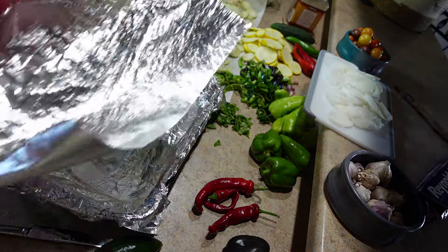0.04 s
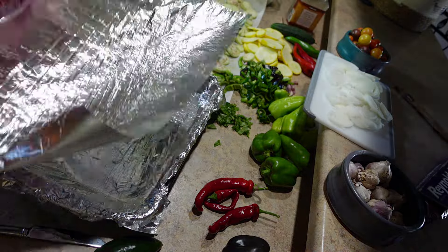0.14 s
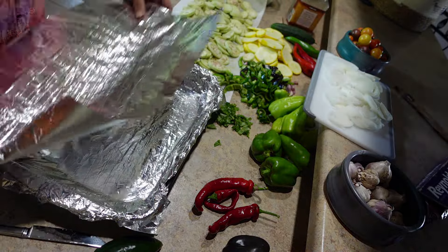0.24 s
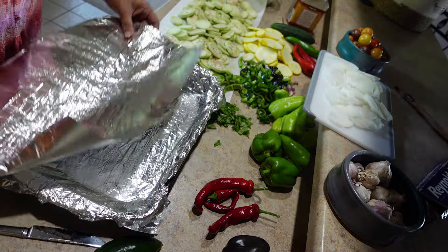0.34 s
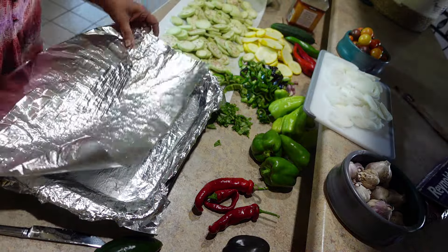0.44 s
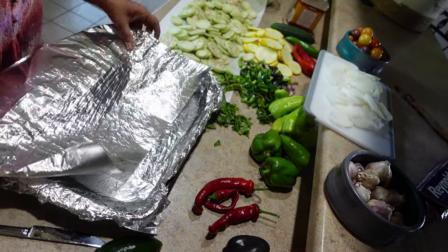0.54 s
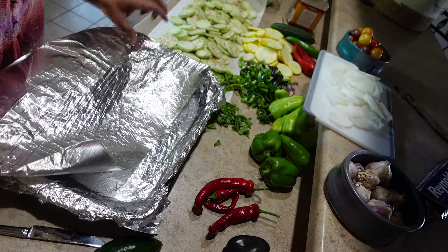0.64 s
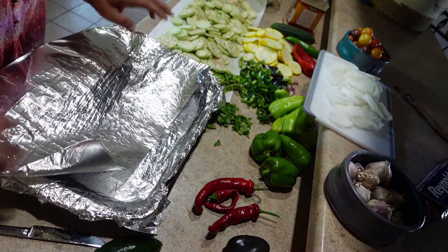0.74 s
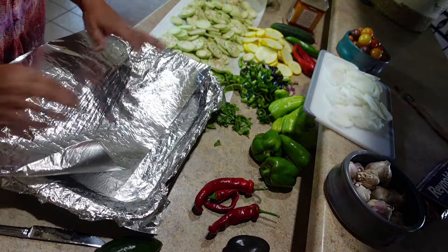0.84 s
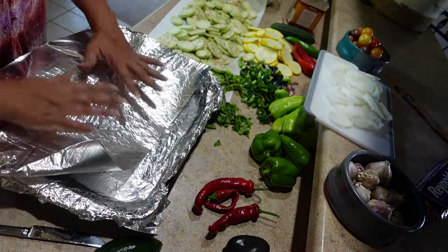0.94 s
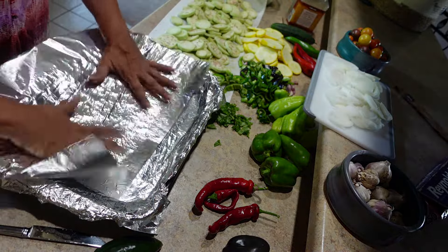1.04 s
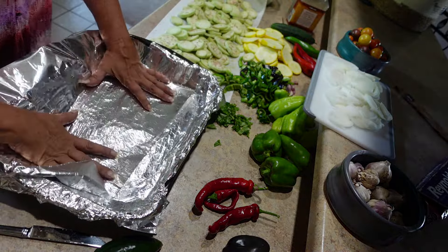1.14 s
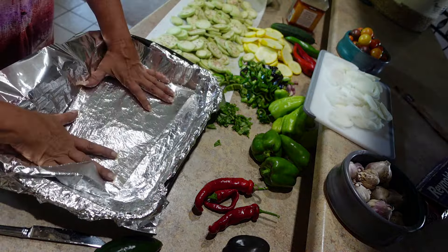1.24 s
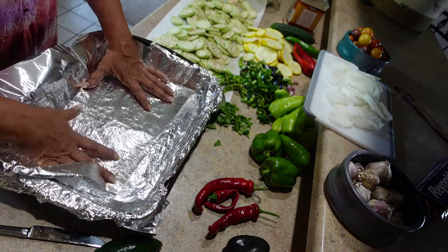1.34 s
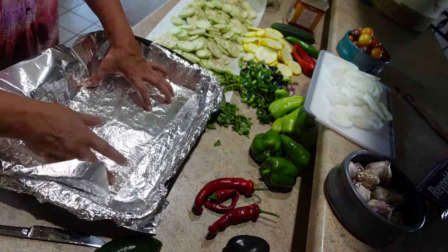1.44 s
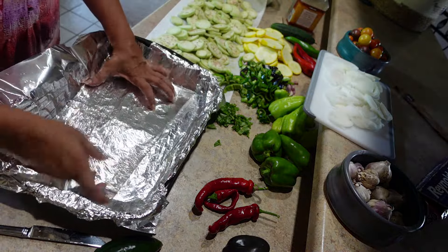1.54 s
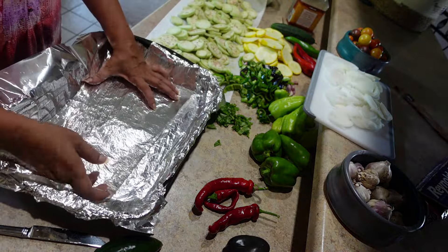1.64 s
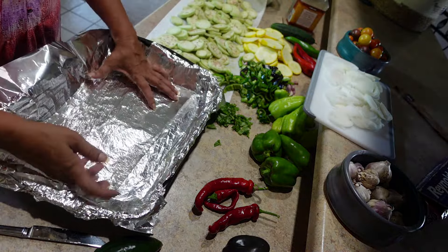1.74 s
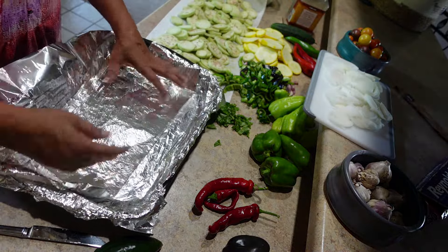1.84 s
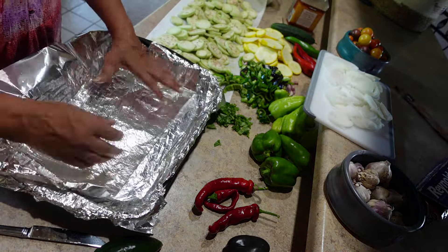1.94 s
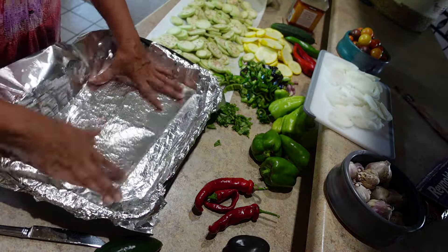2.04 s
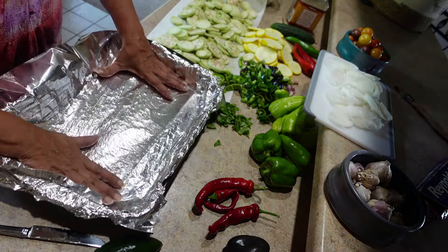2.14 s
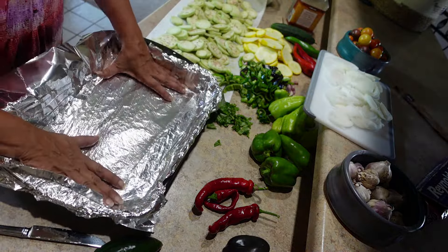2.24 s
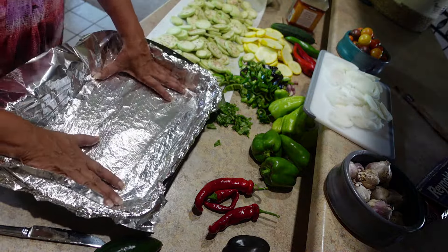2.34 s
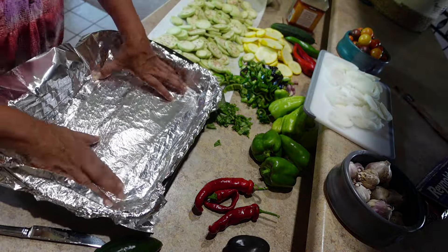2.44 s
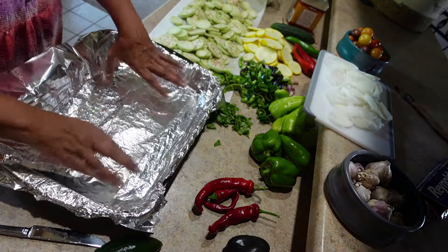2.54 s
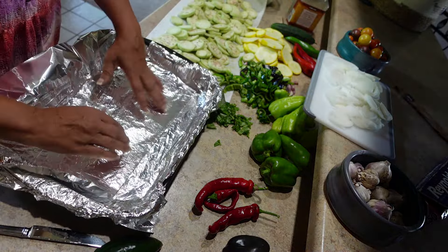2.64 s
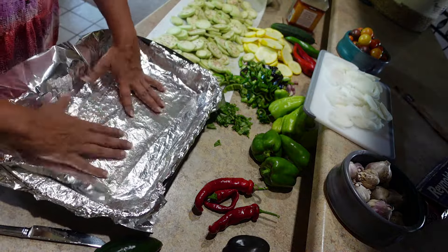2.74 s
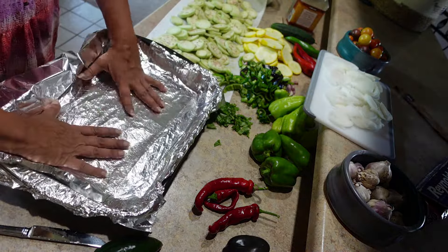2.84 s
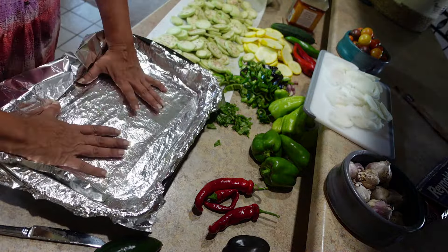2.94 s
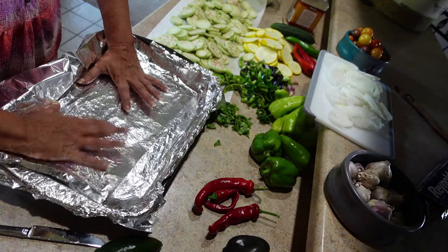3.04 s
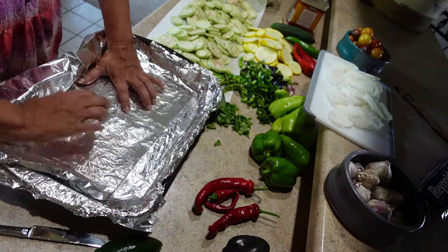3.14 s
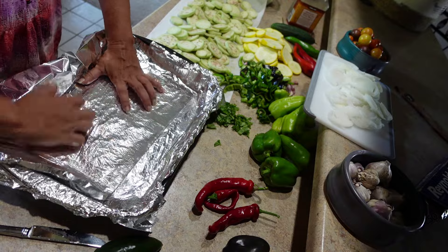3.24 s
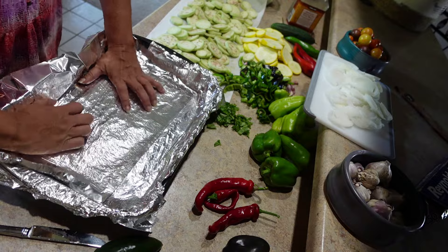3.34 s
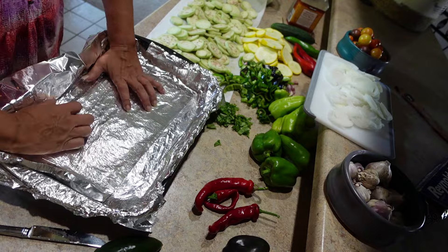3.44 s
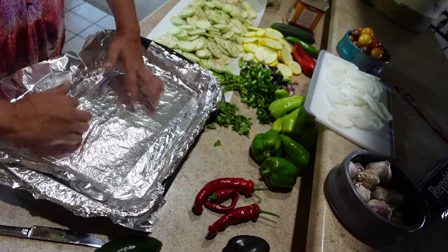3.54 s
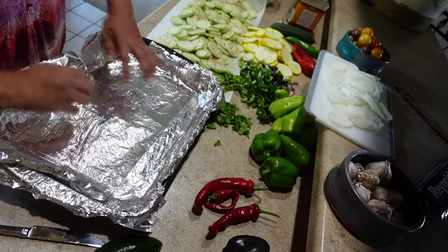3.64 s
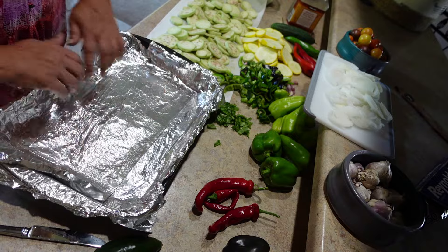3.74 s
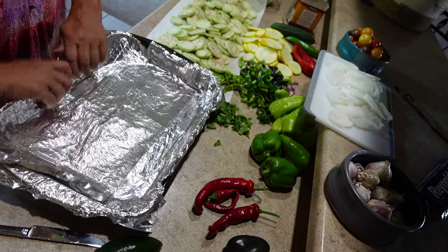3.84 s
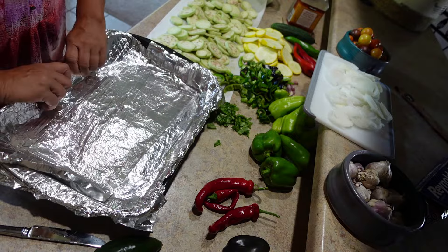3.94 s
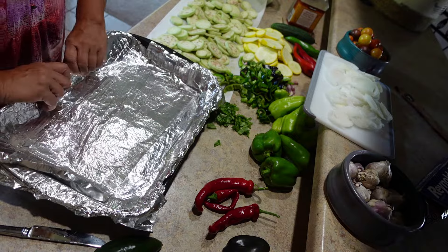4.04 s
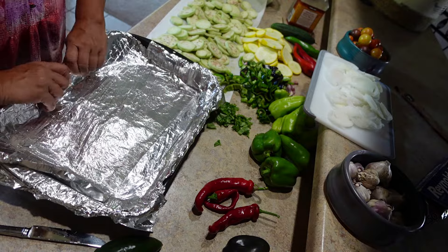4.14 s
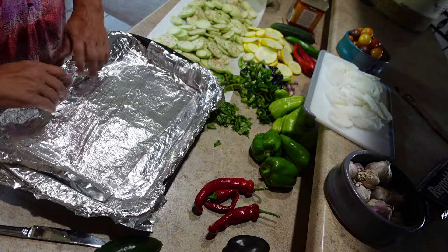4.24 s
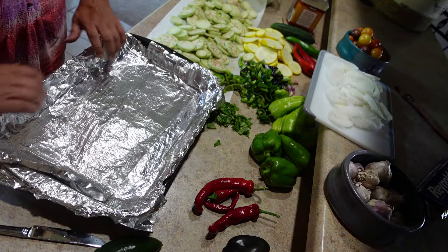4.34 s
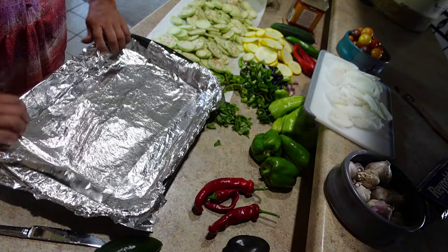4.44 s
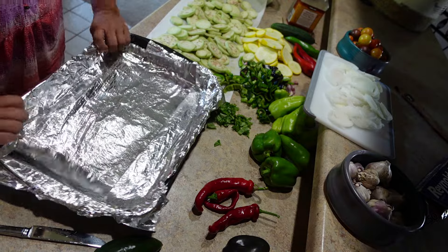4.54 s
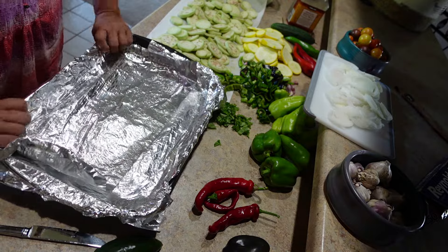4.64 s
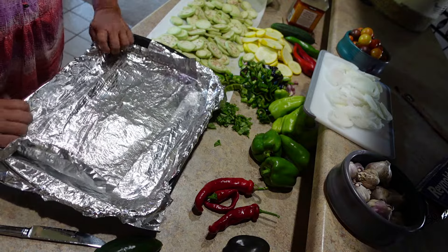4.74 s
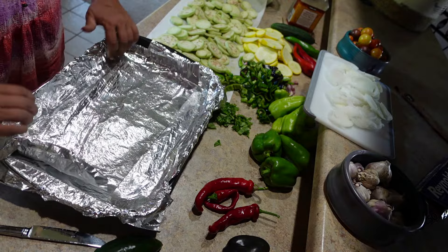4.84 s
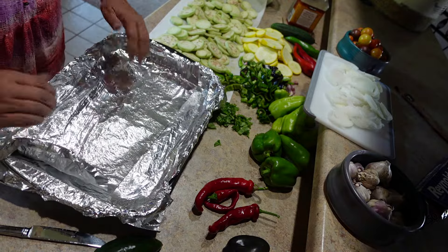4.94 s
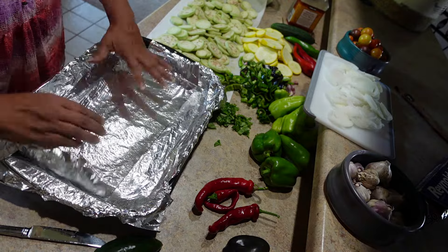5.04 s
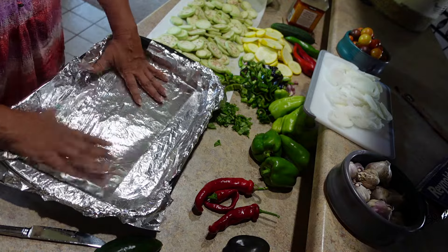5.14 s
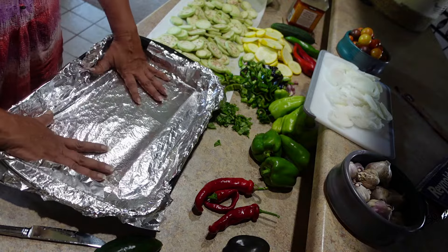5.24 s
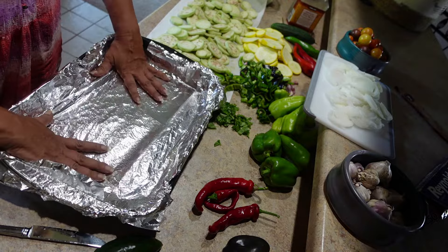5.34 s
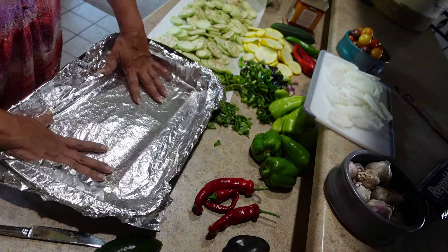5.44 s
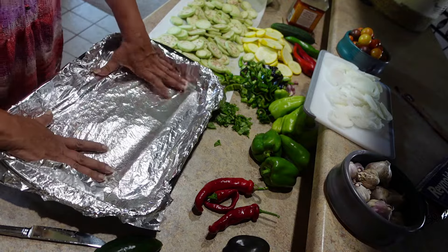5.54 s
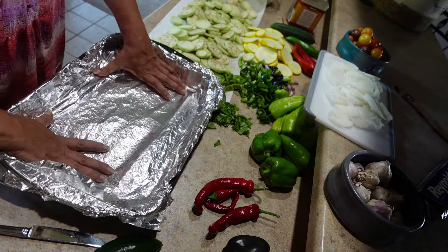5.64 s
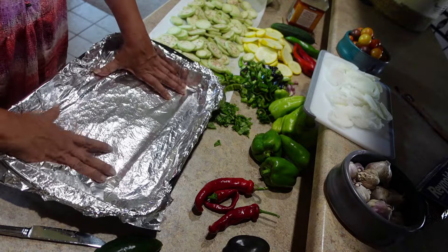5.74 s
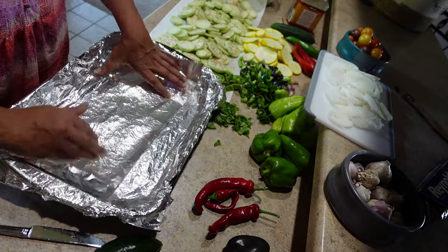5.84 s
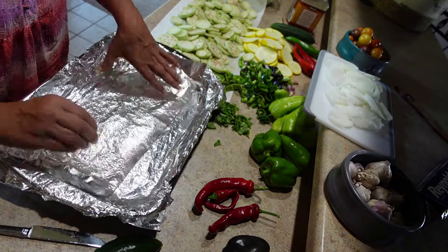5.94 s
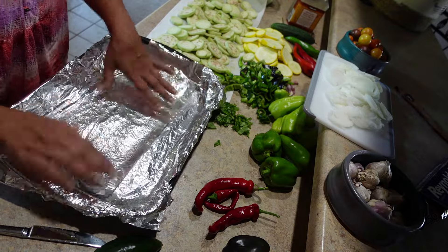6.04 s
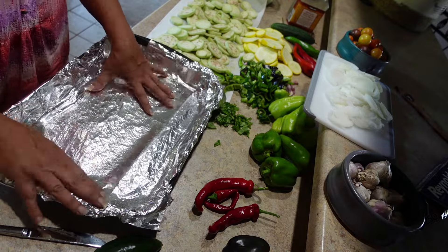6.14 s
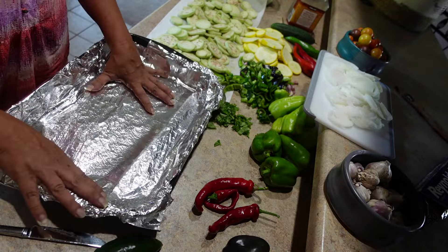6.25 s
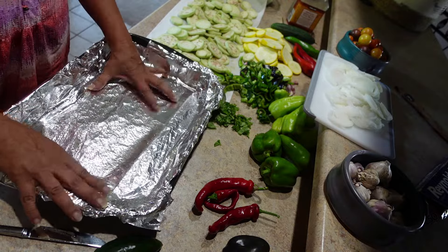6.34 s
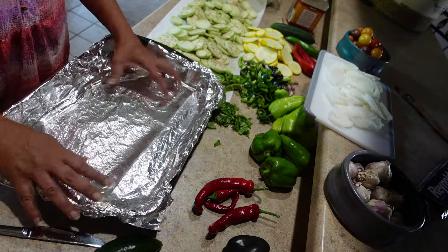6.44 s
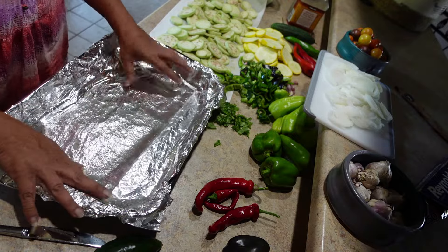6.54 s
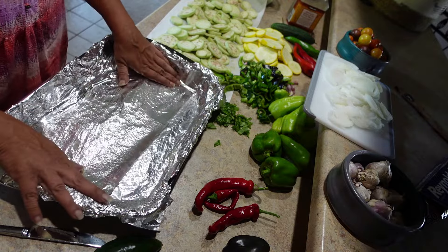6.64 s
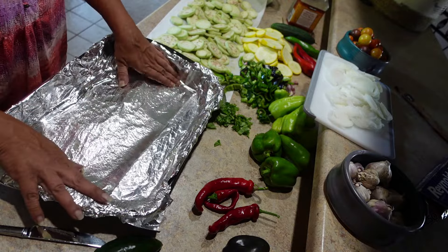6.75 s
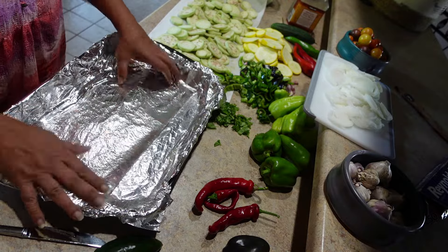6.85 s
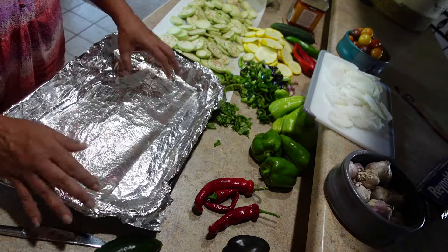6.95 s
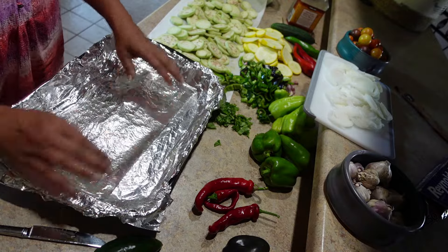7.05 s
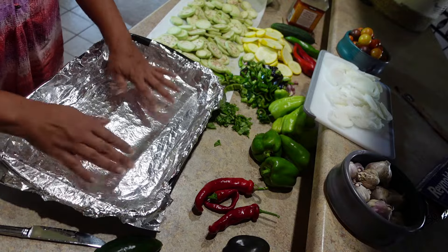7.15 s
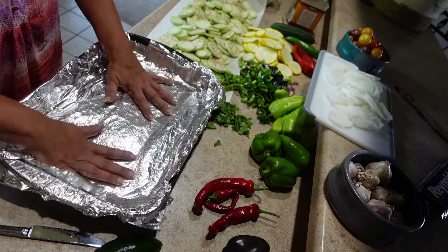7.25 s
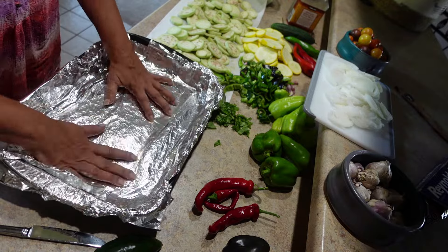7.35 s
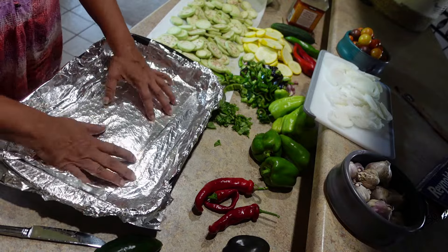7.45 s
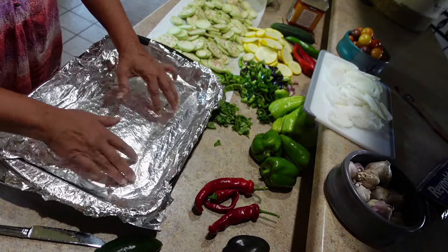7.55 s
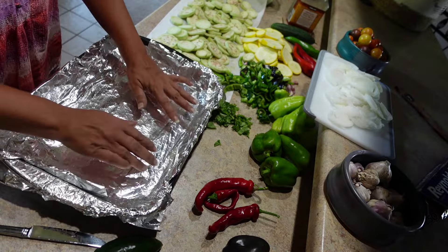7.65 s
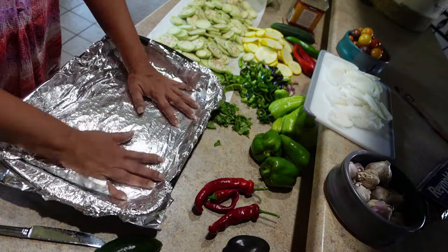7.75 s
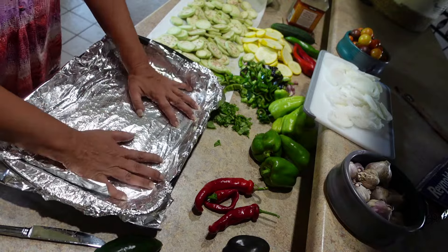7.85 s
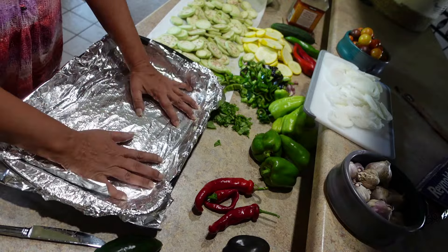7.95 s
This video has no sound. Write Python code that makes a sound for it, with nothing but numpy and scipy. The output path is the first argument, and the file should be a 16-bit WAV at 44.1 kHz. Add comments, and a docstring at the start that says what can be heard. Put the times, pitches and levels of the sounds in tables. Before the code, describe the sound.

Foil rustles from the first moment, then crunches loudly as palms push it down, again and again for eight seconds. Rubbing strokes swell and stop abruptly, with brief near-quiet gaps. Ringing clicks and tinny popping panels stand out, with dull pan thuds below. The close stereo pickup leans slightly left, with short hard-room reflections and a faint whir.

```python
"""A kitchen counter, heard close up: two hands press a sheet of aluminium foil into a metal baking pan.
Swarms of filtered random clicks crackle under each stroke; creases give way in bursts and single ringing snaps.
Wide panels flex lower and cave in with hollow notes, and the palms bump the pan, a set of low resonances.
A small hard room answers with fading noise tails, over a faint steady whir."""
import sys
import numpy as np
from scipy import signal
from scipy.fft import rfft, irfft, next_fast_len
from scipy.io import wavfile
from scipy.ndimage import uniform_filter1d

SR = 44100
rng = np.random.default_rng(int(sys.argv[2]) if len(sys.argv) > 2 else 0)


def generate_wav(sig):
    """Save sig (samples, or channels by samples) to the path in sys.argv[1] as 16-bit PCM at SR."""
    pcm = np.round(np.clip(np.atleast_2d(sig).T, -1, 1) * 32767).astype(np.int16)
    wavfile.write(sys.argv[1], SR, pcm)


N = 353241

# tone of the crumpling foil: (frequency [Hz], relative density [dB per Hz])
FOIL_TONE = [(30, -51), (80, -33), (200, -18.5), (400, -15), (800, -10), (1400, -1.5), (2000, -1.54),
             (3000, -0.5), (4600, 0), (5800, -2.5), (8000, -9.5), (11000, -17), (15800, -30)]


def amp(db):
    """Decibels to gain."""
    return 10 ** (np.asarray(db) / 20)


def unit(x):
    """Scale to rms 1."""
    return x / np.sqrt(np.mean(x ** 2) + 1e-20)


def along(points, hz):
    """(Hz, value) points read on a log-frequency axis."""
    f, v = np.transpose(points)
    return np.interp(np.log(hz + 1), np.log(f), v)


def wobble(rate):
    """A random curve with rate knots a second, joined by straight lines."""
    knots = rng.standard_normal(int(N * rate / SR) + 4)
    return np.interp(np.arange(N) * rate / SR, np.arange(len(knots)), knots)


def filtered(x, response):
    """Shape the spectrum of x by a response of frequency."""
    n = x.shape[-1]
    m = next_fast_len(n + 8192, real=True)  # padded so that tails do not wrap onto the start
    return irfft(rfft(x, m) * response(np.fft.rfftfreq(m, 1 / SR)), m)[..., :n]


def resonances(modes, f):
    """Causal response of (Hz, width Hz, dB) modes, summed with alternating sign."""
    total = 0
    for k, (centre, width, db) in enumerate(modes):
        mode = 1j * f * width / (centre * centre - f * f + 1j * f * width)
        total = total + (-1) ** k * amp(db) * mode
    return total


def hump(f, centre_hz, octaves):
    """A bell on the log-frequency axis."""
    return np.exp(-.5 * (np.log2((f + 1) / centre_hz) / octaves) ** 2)


def spread(pair):
    """Two unrelated signals become left and right, as alike at each frequency as the table says."""
    # left-right likeness of sound from all sides: (frequency [Hz], coherence [0-1])
    alike = [(100, .99), (300, 0.67), (1200, 0.81), (4000, 0.78), (8000, 0.65), (13000, 0.41)]
    turn = lambda f: np.arccos(np.clip(along(alike, f), -1, 1)) / 2
    mid, side = filtered(pair, lambda f: np.array([np.cos(turn(f)), np.sin(turn(f))]))
    return np.array([mid + side, mid - side])


def add(track, s, sound):
    """Mix a sound into a track at time s."""
    part = track[..., max(0, round(s * SR)):][..., :sound.shape[-1]]
    part += sound[..., :part.shape[-1]]


def steady(x, seconds):
    """A texture brought near rms 1 over each short stretch, its grain kept."""
    power = uniform_filter1d(np.mean(np.atleast_2d(x) ** 2, axis=0), max(2, int(seconds * SR)))
    return x / np.sqrt(np.abs(power) + 1e-4 * power.mean())


def dying(power, t60):
    """Each impulse of power fades by 60 dB in t60."""
    keep = float(amp(-120 / (max(t60, .001) * SR)))
    return np.abs(signal.lfilter([1 - keep], [1, -keep], power))


def surges(rows, t60, offset_db, attack):
    """Power of (s, dB) events that rise quickly and die away."""
    t, power = np.arange(SR // 2) / SR, np.zeros(N)
    for s, db in rows:
        gain = amp(db + offset_db - 60 * t / t60) * (1 - np.exp(-t / attack))
        add(power, s - attack, gain ** 2)
    return power


def buckles(rate, size_db):
    """Random impulses of either sign and unequal size, rate a second."""
    at = np.flatnonzero(rng.random(N) < rate / SR)
    train = np.zeros(N)
    sign = rng.choice([-1, 1], len(at))
    train[at] = sign * amp(size_db * np.clip(rng.standard_normal(len(at)), -2, 2))
    return train


def shiver(train, t60, click):
    """Each impulse is a click and a brief noisy shiver of the sheet, never twice the same."""
    out = np.sqrt(dying(train ** 2, t60)) * rng.standard_normal((2, N))
    out[0] += click * train
    return out


def background():
    """A faint, steady whir in the room: broad noise with a few narrow bands in it."""
    # the rush: (frequency [Hz], relative density [dB per Hz])
    rush_tone = [(25, -32), (60, -26.5), (95, -7), (200, -8), (340, 3), (480, -20), (700, 4), (950, -2),
                 (1300, -4), (1850, -3), (2600, -13), (5000, -11.5), (10000, -25), (16000, -30)]
    # narrow bands of the whir: (centre [Hz], width [Hz], relative level [dB])
    whir_bands = [(90, 7.6, -4.5), (344, 120, -1), (700, 82, 0.5), (1149.3, 50, 5), (1420, 25, -14),
                  (1610, 23, -10), (1890, 82, 1.5)]
    rush = unit(filtered(rng.standard_normal((2, N)), lambda f: amp(along(rush_tone, f))))
    bands = unit(filtered(rng.standard_normal((2, N)), lambda f: resonances(whir_bands, f)))
    return spread(amp(-55.5) * rush + amp(-56) * bands)


def hands():
    """Presses, rubs and touches add in power: crackle level, panel flex and treble lift, as gains per sample."""
    # a palm comes down, crushes the foil and eases off: (time [s], relative crackle level [dB],
    # rise [s], hold [s], panel flex offset [dB], treble offset [dB])
    presses = [(0.061, -21, 0.008, 0.039, -3, 1), (1.025, -17.5, 0.037, 0.138, 2, 0),
               (2.052, -18, 0.008, 0.097, -1.5, 0), (2.714, -24, 0.0099, 0.053, -4, 0),
               (2.76, -19.5, 0.0078, 0.086, -1, 0), (3.275, -20.5, 0.01, 0.056, 6, 0.5),
               (3.831, -24.5, 0.0078, 0.098, 4.5, -3), (4.464, -19, 0.005, 0.15, 0.5, -2.5),
               (5.111, -26, 0.0046, 0.061, -3.5, -4), (5.181, -18, 0.012, 0.055, -2, -1),
               (6.133, -18.5, 0.0032, 0.06, -4, -1.5), (6.54, -23, 0.0052, 0.095, -9, -3.5),
               (7.269, -20.5, 0.0085, 0.037, -3, -1), (7.746, -18, 0.018, 0.067, -3.5, -0.5)]
    # fingers push along a wrinkle, harder and harder until it lies flat: (peak time [s],
    # relative crackle level [dB], swell [s], panel flex offset [dB], treble offset [dB])
    rubs = [(0.005, -25, 0.058, -7, 0), (0.17, -27, 0.054, -6, -14), (0.285, -26, 0.085, -9, 0),
            (0.482, -22, 0.074, -13, 0), (0.545, -22, 0.041, -7, -1.5), (1.29, -28, 0.059, 8, 4.5),
            (1.61, -18, 0.077, 2, -2.5), (1.857, -21.5, 0.095, 0, -2), (2.255, -22, 0.04, 1, -1),
            (2.515, -23, 0.1, -4, -0.5), (2.615, -25, 0.04, -7.5, -6), (3.15, -26, 0.042, -4, -3),
            (3.42, -29, 0.03, 4, -2), (3.505, -28, 0.03, 5, -5), (4.285, -23, 0.015, -8.5, -6),
            (4.865, -22, 0.06, -14, -0.5), (5.585, -21, 0.05, -2, 0.5), (5.665, -24, 0.046, -4, 1),
            (5.885, -18.5, 0.064, -3.5, 0.5), (6.26, -25, 0.026, 2, 1.5), (6.667, -18.5, 0.082, -8, 1.5),
            (6.85, -29, 0.025, -4, 6), (6.935, -29.5, 0.065, -10, -0.5)]
    # the sheet stirs as long as a hand rests on it: (start [s], end [s],
    # relative crackle level [dB], panel flex offset [dB], treble offset [dB])
    touches = [(0.0, 0.329, -31, -3, 6.5), (0.397, 0.698, -31, 4.5, 1.5), (0.729, 0.785, -39, -7, -5),
               (0.851, 1.029, -42, 2, 3), (1.038, 1.89, -32, 1, 5), (1.919, 2.02, -38, 6, 3),
               (2.07, 2.68, -29, 1.5, 3), (2.72, 3.205, -32, -0.5, 4), (3.222, 3.584, -34, -2.5, 4.5),
               (3.839, 4.079, -34, 3, 8.5), (4.176, 4.283, -34, 5, 3.5), (4.299, 4.47, -50, 12, -12),
               (4.471, 4.7, -35, 5, -1), (4.749, 4.92, -33, -1, -2), (5.104, 5.49, -32, -4, 3.5),
               (5.515, 6.002, -32, -1, 3.5), (6.14, 6.476, -35, -5.5, 3.5), (6.53, 6.961, -39, 3, 7),
               (7.239, 7.27, -50, -4, 13), (7.28, 7.388, -35, 0, 6), (7.427, 7.601, -34.5, 1, 3.5),
               (7.751, 7.99, -39, 6, 3)]
    ease_db_per_s, release_db_per_s = 135, 240  # fade after a press; after a rub or touch
    swell_db, swell_bow = 10, 1.6  # rise over one swell time; how much it rounds off near its peak
    touch_rise_s = 0.008
    usual_db, usual_flex_db, flex_growth = -25.5, -40, 0.83  # crackle level; flex there; dB per crackle dB
    treble_lift_db, dull_below_db, dulling = 5.5, -25, 0.31  # lift; crackle level where it falls; dB per dB

    t = np.arange(0, N / SR, .001)
    arrive = lambda s, rise_s: 1 - np.exp(-np.maximum(t - s, 0) / rise_s)
    fade = lambda s, db_per_s: amp(-db_per_s * np.maximum(t - s, 0))
    moves = []
    for s, db, rise, hold, bend, fine in presses:
        moves.append((amp(db) * arrive(s, rise) * fade(s + hold, ease_db_per_s), bend, fine))
    for s, db, swell, bend, fine in rubs:
        below_peak_db = swell_db * (np.maximum(s - t, 0) / swell) ** swell_bow
        moves.append((amp(db - below_peak_db) * fade(s, release_db_per_s), bend, fine))
    for s, end, db, bend, fine in touches:
        moves.append((amp(db) * arrive(s, touch_rise_s) * fade(end, release_db_per_s), bend, fine))

    gains, bend_db, fine_db = map(np.array, zip(*moves))
    power = np.sum(gains ** 2, axis=0) + 1e-12
    share, level_db = gains ** 2 / power, 10 * np.log10(power)
    # panels bend with the crumpling; the finest wrinkles break only under force
    flex_db = usual_flex_db + flex_growth * (level_db - usual_db) + bend_db @ share
    treble_db = treble_lift_db - dulling * np.clip(dull_below_db - level_db, 0, 20) + fine_db @ share
    return [np.interp(np.arange(N) / SR, t, amp(db)) for db in (level_db, flex_db, treble_db)]


def effort(crumple):
    """Crackle level: the foil holds for a moment under load, then a crease gives way in a fading run."""
    # a crease gives way in a run of buckles: (time [s], relative level [dB])
    creases = [(0.0678, -9), (0.419, -14), (0.6578, -15), (0.7572, -21), (0.8553, -25), (0.875, -24.5),
               (1.036, -13), (1.341, -12), (1.5685, -10), (1.7667, -14), (1.9685, -14), (2.064, -9),
               (2.3425, -12), (2.4694, -10), (2.7177, -9), (2.7648, -8), (2.812, -7), (2.9392, -10),
               (2.9732, -11), (3.053, -10), (3.1055, -11), (3.286, -6), (3.8332, -11), (4.013, -11),
               (4.118, -14), (4.1752, -20), (4.282, -11), (4.4683, -8), (4.7521, -17), (4.8448, -13),
               (5.1117, -12), (5.3562, -6), (5.4651, -16.5), (5.5166, -14), (5.554, -7), (5.6407, -11),
               (6.1353, -8), (6.321, -19.5), (6.5451, -12.5), (6.83, -16), (7.2802, -8.5), (7.429, -13.5),
               (7.6074, -8), (7.7499, -12), (7.9205, -11)]
    level = crumple.copy()
    for s, _ in creases:
        hold = slice(max(0, round((s - .03) * SR)), round(s * SR))
        level[hold] *= amp(-3.5 * np.linspace(0, 1, len(level[hold])))
    # countless lesser creases: a jump, then a fade
    runs = steady(np.sqrt(dying(buckles(rate=170, size_db=2.5) ** 2, t60=.06)), seconds=.05)
    bursts = surges(creases, t60=0.125, offset_db=-13.0, attack=.0012)
    return np.sqrt(level ** 2 * (.72 + .2 * runs ** 2) + bursts)


def swarm(rate, size_db, ring_t60, patchy_db, octaves, count=8):
    """Buckles shared among facets from large and low to small and high, each with its own impulses."""
    out = np.zeros((2, N))
    for centre_hz in np.geomspace(700, 18000, count):
        train = buckles(rate / count, size_db) * amp(patchy_db * wobble(22))
        out += filtered(shiver(train, ring_t60, click=0.85), lambda f: hump(f, centre_hz, octaves) + 0.45)
    return out


def pings(t60, size_db, count=4400):
    """Small taut facets ring for a moment as decaying sines, each at a pitch of its own."""
    t = np.arange(SR // 40) / SR
    when, pitch, ear = rng.random((count, 3)).T[:, :, None]
    hz = 900 + 8000 * pitch ** 2
    size = amp(size_db * np.clip(rng.standard_normal((count, 1)), -2, 2)) * np.sqrt(pitch + .05)
    rings = size * amp(-60 * t / t60) * np.sin(2 * np.pi * hz * t)
    at = ((when * N).astype(int) + np.arange(len(t))).ravel()
    sides = (np.cos(2 * np.pi * ear), np.sin(2 * np.pi * ear))
    return np.array([np.bincount(at, (rings * side).ravel(), N)[:N] for side in sides])


def crackle(level, fineness):
    """Harder crumpling breaks more and louder buckles."""
    rate = 2200 + 7000 * level / amp(-20)
    grains = swarm(rate, size_db=1.5, ring_t60=0.043, patchy_db=0.0, octaves=0.79)
    grains = unit(steady(grains, seconds=0.22))
    grains = grains + .36 * unit(pings(t60=0.054, size_db=2.0))
    grains = spread(filtered(grains, lambda f: amp(along(FOIL_TONE, f))))
    grains = steady(grains, seconds=0.012)
    # fine wrinkles ring higher than broad ones
    treble = filtered(grains, lambda f: 1 / (1 + (7000 / (f + 1)) ** 4))
    return level * (grains + treble * (fineness - 1))


def flex(bending):
    """Wide panels flap and cave in; part rings in the pan's hollow, part shifts in pitch among many folds."""
    # wide panels of foil lying in the pan: (centre [Hz], width [Hz], relative level [dB])
    panels = [(368, 34, -11), (456.5, 42, 0.5), (514, 45, -3), (640.6, 24, -2.5), (691, 34, -5.5),
              (900, 125, -3), (1100, 460, -2.5), (1360, 390, -1)]
    pops = shiver(buckles(rate=350, size_db=1), t60=0.0082, click=1.67)
    ringing = unit(filtered(pops, lambda f: resonances(panels, f) * hump(f, 950, octaves=1.67)))
    loose = np.zeros((2, N))
    for centre_hz in np.geomspace(340, 1900, num=14):
        fold = shiver(buckles(rate=150, size_db=4.5), t60=0.018, click=1.83)
        fold = filtered(fold, lambda f: hump(f, centre_hz, octaves=0.055))
        loose += unit(fold) * hump(centre_hz, 1170, octaves=0.98) * amp(3.9 * wobble(11))
    body = steady(spread(ringing + 1.28 * unit(loose)), seconds=0.046)
    return body * bending + hollows(body)


def kitchen(x, count=21):
    """The walls' answer: noise tails, each frequency dying at its own speed, one echo pattern melting into the next."""
    # the kitchen's ring: (frequency [Hz], 60 dB decay time [s])
    room_decay = [(150, 0.89), (600, 0.56), (2000, 0.66), (6000, 0.32), (14000, 0.34)]
    out, hop, source = np.zeros((2, N)), N // (count - 1), x.mean(axis=0)
    for k in range(count):
        hz, t, z = signal.stft(rng.standard_normal((2, SR // 2)), SR, nperseg=256)
        decay = amp(-60 * t / along(room_decay, hz)[:, None])
        tail = signal.istft(z * decay, SR, nperseg=256)[1]
        at = np.arange(max(0, (k - 1) * hop), min(N, (k + 1) * hop))
        part = source[at] * np.cos(np.pi / 2 * (at / hop - k))  # crossfade
        echo = signal.fftconvolve(part[None], tail / np.linalg.norm(tail[0]), axes=1)
        add(out, at[0] / SR + .004, echo)
    return spread(out)


def snaps():
    """Single facets flip: a click, then a short noisy ring around their own pitch."""
    # one facet snaps through: (time [s], relative level [dB], ring [Hz])
    facets = [(0.3585, -13.5, 2630), (1.2371, -9.5, 3336), (1.285, -17, 4900), (1.475, -15, 2634),
              (2.397, -9, 3960), (3.2414, -24, 5430), (3.8914, -6.5, 1650), (4.0569, -12, 4387),
              (4.1183, -15, 5630), (4.2225, -20, 3899), (4.2636, -11, 5555), (4.5641, -5, 1828),
              (4.8127, -18, 3182), (5.236, -17, 4796), (5.7118, -9, 2743), (6.321, -18, 3970),
              (6.6184, -17, 5686), (6.7107, -11, 4833), (7.868, -12, 3490)]
    out, t = np.zeros((2, N)), np.arange(SR // 20) / SR
    for s, db, ring_hz in facets:
        ring = rng.standard_normal((2, len(t))) * amp(-60 * t / .022)
        ring[0, 0] += 3  # the click
        ring = np.pad(ring, ((0, 0), (SR // 1000, 0)))
        tone = lambda f: amp(along(FOIL_TONE, f)) * (0.46 + hump(f, ring_hz, octaves=0.13))
        ring = filtered(ring, tone)
        add(out, s, ring / np.abs(ring).max() * amp(db - 0.5))
    return spread(out)


def hollows(body):
    """Each caving panel sounds the part of the sheet's low ring that suits its size."""
    # a wide panel caves in with a hollow sound: (time [s], relative level [dB], pitch [Hz])
    caving = [(1.088, -21.5, 800), (1.588, -33, 799.6), (2.142, -16, 645), (2.771, -13.5, 950),
              (2.82, -24, 700), (2.94, -20, 801), (3.32, -30, 598.4), (3.478, -24, 702), (3.85, -11.5, 904),
              (3.882, -16.5, 800), (3.961, -24, 598.5), (4.174, -25, 1000), (4.282, -25, 900),
              (4.495, -15, 748.6), (4.565, -29, 900), (4.755, -28.5, 904.6), (4.86, -35, 801),
              (5.36, -20.5, 901), (5.725, -27.5, 801.4), (6.665, -24.5, 853), (7.299, -20, 600),
              (7.812, -14.5, 579)]
    out, t = np.zeros((2, N)), np.arange(SR // 6) / SR
    for s, db, pitch_hz in caving:
        stretch = body[:, round(s * SR):][:, :len(t)]
        ring = unit(filtered(stretch, lambda f: hump(f, pitch_hz, octaves=1)))
        fall = amp(db - 6.5 - 60 * t / 0.2)  # 60 dB in 0.2 s
        add(out, s - .003, ring * fall * (1 - np.exp(-t / 0.0019)))
    return out


def bumps(bending):
    """Each palm lands softly and the pan shudders on the counter; bending foil stirs it a little too."""
    # a palm bumps the pan: (time [s], relative level [dB])
    palms = [(1.134, -37), (1.189, -48), (2.079, -48), (2.145, -30.5), (2.219, -39), (2.769, -42),
             (2.849, -38), (3.312, -36), (3.939, -41), (4.271, -47), (4.505, -32), (6.175, -30),
             (6.199, -41), (7.299, -32), (7.329, -38), (7.779, -37), (7.818, -31.5), (7.868, -35.5)]
    # the pan on the counter: (centre [Hz], width [Hz], relative level [dB])
    pan = [(63.7, 21, -3.5), (95, 55, -4.5), (136, 51, -1.5), (185.4, 15, 0.5), (254, 46, -2.5),
           (288, 49, -1.5), (374, 33, -27)]
    force = surges(palms, t60=0.24, offset_db=-2.0, attack=0.0026) + (amp(-20.5) * bending) ** 2
    shudder = rng.standard_normal(N)
    shudder = filtered(shudder, lambda f: resonances(pan, f) * hump(f, 182, octaves=0.98))
    return np.sqrt(force) * steady(shudder, seconds=0.022)


def scene():
    """Foil a little to the left, pan bumps in the middle, in the kitchen."""
    crumple, bending, fineness = hands()
    foil = crackle(effort(crumple), fineness) + snaps() + flex(bending)
    close = foil * amp([[.45], [-.45]]) + bumps(bending)
    return close + amp(-13.0) * kitchen(close) + background()


def record(dry):
    """The microphone drops the deep bass, rounds the tallest peaks and keeps nothing above its band limit."""
    top_hz = 15900
    x = filtered(dry, lambda f: 1 / np.sqrt(1 + (48 / (f + 1)) ** 8))
    x = x / (1 + np.abs(x / .65) ** 6) ** (1 / 6)
    return filtered(x, lambda f: f < top_hz)


dry = scene()
out = record(dry)
generate_wav(out)
```